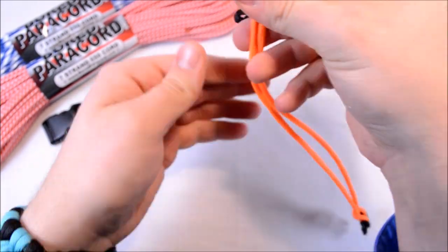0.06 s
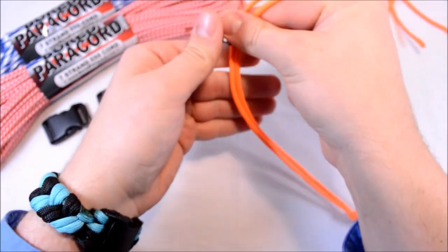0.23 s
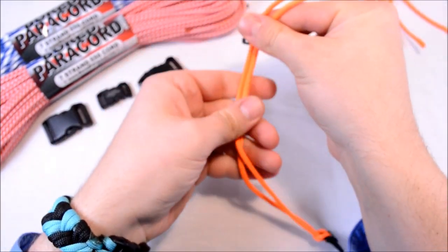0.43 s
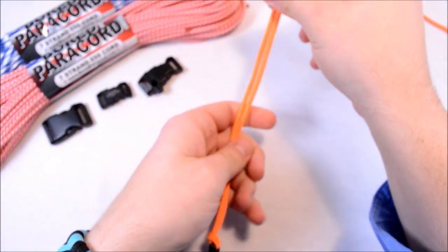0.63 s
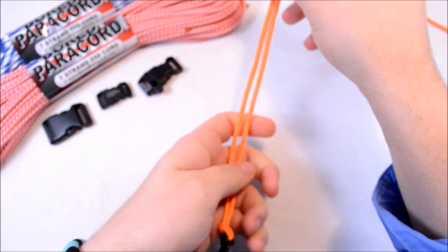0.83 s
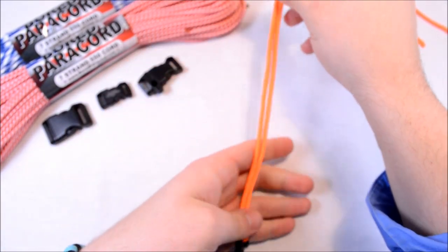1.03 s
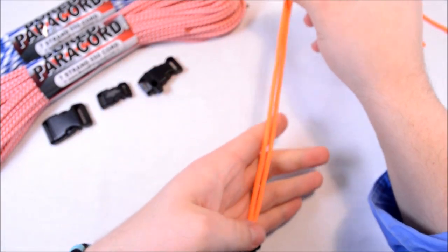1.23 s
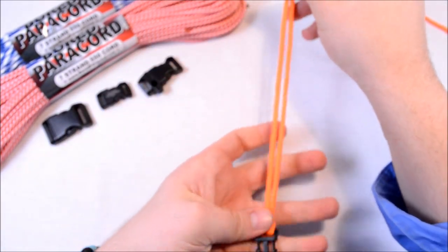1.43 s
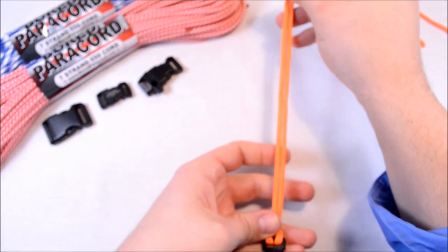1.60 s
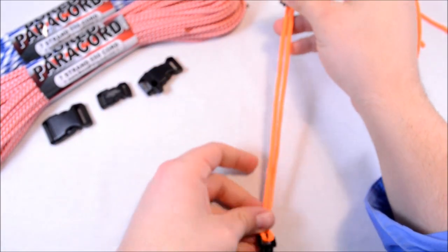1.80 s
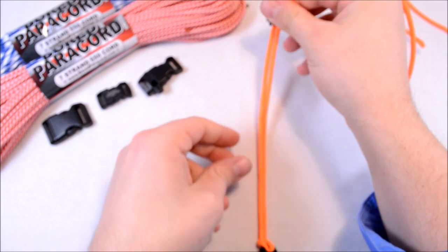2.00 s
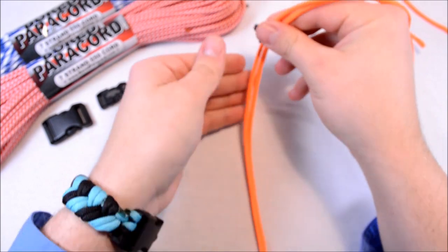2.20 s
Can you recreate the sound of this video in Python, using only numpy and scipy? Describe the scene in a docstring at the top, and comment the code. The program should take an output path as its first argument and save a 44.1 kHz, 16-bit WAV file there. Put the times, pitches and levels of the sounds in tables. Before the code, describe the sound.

Nylon cord slides through fingers in soft, hissing strokes close to the microphone. A plastic buckle knocks on a covered table near the start and again near the end, over a faint fan hum in a small room.

```python
"""Nylon cord through the fingers

Close to the microphone, a doubled nylon cord slides through the fingers in soft, hissing strokes.
The plastic buckle on its end knocks twice on a covered table, rebounding, and the hands bump softly.
The place is a small quiet room, with a fan's hum and a thin electronic whine in the background."""
import sys
import numpy as np
from scipy import signal
from scipy.fft import rfft, irfft, next_fast_len
from scipy.io import wavfile

SR = 44100
rng = np.random.default_rng(int(sys.argv[2]) if len(sys.argv) > 2 else 0)


def output_pcm(signal):
    """Save a mono or channel-first signal as 16-bit PCM at the path in sys.argv[1].

    Samples are clipped to [-1, 1] before scaling.
    """
    pcm = np.clip(np.atleast_2d(signal).T, -1, 1) * 32767
    wavfile.write(sys.argv[1], SR, np.round(pcm).astype(np.int16))


N = 103635


def undb(db):
    """Decibels to amplitude."""
    return 10 ** (np.asarray(db) / 20)


def unit(x):
    """Scale to rms 1."""
    return x / np.sqrt(np.mean(x ** 2))


def fade(t, t60):
    """Exponential decay, 60 dB down at t60."""
    return np.exp(-np.log(1000) * t / t60)


def colour(x, points):
    """Minimum-phase filter through points of (frequency [Hz], gain [dB])."""
    size = next_fast_len(len(x) + 4096) * 2
    hz, db = np.array(points, float).T
    bin_hz = np.arange(size // 2 + 1) * SR / size
    gain_db = np.interp(np.log(bin_hz + 1), np.log(hz), db)
    cepstrum = irfft(np.log(undb(gain_db)))
    cepstrum[1:size // 2] *= 2  # folded, so nothing rings ahead of a knock
    cepstrum[size // 2 + 1:] = 0
    return irfft(rfft(x, size) * np.exp(rfft(cepstrum)))[:len(x)]


def noise(points):
    """Coloured noise of rms 1."""
    return unit(colour(rng.standard_normal(N), points))


def band(hz, width):
    """Narrow noise of rms 1 around one frequency."""
    bin_hz = np.arange(N // 2 + 1) * SR / N
    detuning = (bin_hz - hz) / (width / 2)
    return unit(irfft(rfft(rng.standard_normal(N)) / (1 + detuning ** 2), N))


def wander(per_second):
    """Random curve of rms 1 that glides to a new value so many times a second."""
    return unit(np.interp(np.arange(N) * per_second / SR, np.arange(N), rng.standard_normal(N)))


def swell(start, length, attack, release):
    """Straight rise and fall, capped at 1; times in seconds."""
    t = np.arange(N) / SR - start
    return np.clip(np.minimum(t / attack, (length - t) / release), 0, 1)


def add(out, at, x):
    """Mix x in at a time in seconds."""
    i = int(at * SR)
    out[i:i + len(x)] += x[:N - i]


# Spectrum of the quiet room (frequency [Hz], relative level [dB])
ROOM_TONE_SPECTRUM = [(12, -78), (20, -3), (49, -2), (163, -3.5), (228, -4), (277, -10.5), (558, -14),
                      (678, -16), (976, -16.5), (1400, -19.5), (1530, -19.5), (2140, -23.5), (2910, -25),
                      (3630, -21), (4180, -28), (9670, -28.5), (16000, -35.5)]
# Hum of the fan in the background (centre [Hz], width [Hz], level [dB])
FAN_BANDS = [(222.4, 6.8, -52.5), (182.1, 8.1, -58), (456.7, 21, -64.5), (1524, 42, -67.5),
             (2692, 60, -69.5), (3650, 330, -64)]


def background():
    """Behind the hands: faintly flickering room tone, a fan's hum and a steady electronic whine."""
    room_tone = undb(-47 + 0.58 * wander(per_second=12.81)) * noise(ROOM_TONE_SPECTRUM)
    fan = sum(undb(db) * band(hz, width) for hz, width, db in FAN_BANDS)
    whine_hz, whine_db = 15668, -71
    whine = undb(whine_db) * np.sqrt(2) * np.sin(2 * np.pi * whine_hz * np.arange(N) / SR)
    return room_tone + fan + whine


def small_room(direct):
    """The walls return a short diffuse tail to the microphone, thin in the bass; the treble dies first."""
    low_hz, split_hz, gap_s, tail_db = 527, 1510, 0.0094, -10
    t = np.arange(SR // 2) / SR
    mid_pass = signal.butter(2, [low_hz, split_hz], "band", fs=SR, output="sos")
    high_pass = signal.butter(2, split_hz, "high", fs=SR, output="sos")
    mids = signal.sosfilt(mid_pass, rng.standard_normal(len(t))) * fade(t, t60=0.23)
    treble = signal.sosfilt(high_pass, rng.standard_normal(len(t))) * fade(t, t60=0.17)
    tail = (mids + treble) * (t > gap_s)
    return direct + undb(tail_db) * signal.fftconvolve(direct, tail / np.linalg.norm(tail))[:N]


# Soft bumps near the microphone (time [s], pitch [Hz], t60 [s], level [dB])
HAND_BUMPS = [(1.139, 131, 0.061, -29.5), (1.223, 150, 0.11, -36.5), (1.639, 122, 0.11, -36)]


def hands():
    """Each bump of the hands is one low, quickly damped tone."""
    out, t = np.zeros(N), np.arange(SR // 4) / SR
    for at, hz, t60, db in HAND_BUMPS:
        add(out, at, undb(db) * np.sin(2 * np.pi * hz * t) * fade(t, t60))
    return out


# Modes of table and buckle (frequency [Hz], relative level [dB], free t60 [s])
KNOCK_MODES = [(156.6, -27, 0.39), (191, -16, 0.17), (298.5, -4.5, 0.21), (387, 4.5, 0.039),
               (416.2, -2.5, 0.12), (519.6, 0, 0.09), (616.4, -10.5, 0.15), (644, -10.5, 0.11),
               (749, -9.5, 0.13), (801, -8.5, 0.1), (836, -8, 0.092), (873, -14, 0.051), (926, -8, 0.078),
               (981, -11.5, 0.085), (1254, -10.5, 0.13), (1377, -13, 0.11), (1634, -16, 0.14),
               (1780, -26, 0.14), (1968, -20, 0.1), (3240, -16, 0.12), (3500, -17.5, 0.16)]
# Spectrum of the contact crack (frequency [Hz], relative level [dB])
CRACK_SPECTRUM = [(100, -3.5), (400, 3.5), (1000, -7), (2000, -6.5), (3300, -7.5), (3900, -9.5),
                  (5000, -6.5), (6200, -10), (7000, -21), (10000, -25), (13000, -47), (16000, -52)]
# Landings on the covered table
# (time [s], thump gain [dB], body gain [dB], clack gain [dB], snap gain [dB], share of free t60 [ratio])
BUCKLE_LANDINGS = [(0.2314, -16, -23, -23.5, -19, 0.99), (0.2862, -34.5, -30, -31.5, -55, 0.78),
                   (0.335, -42, -49, -48, -48, 0.93), (0.485, -33.5, -45.5, -43, -72, 0.49),
                   (2.0033, -23.5, -19, -16, -25.5, 0.82), (2.0320, -39, -38, -30, -40.5, 0.47)]


def buckle():
    """Contact cracks and sets table and buckle ringing; how it lands sets the colour and damping."""
    thump_hz, body_hz, clack_hz, snap_hz, low_cut_hz = 367, 615, 1400, 4370, 100
    out, t = np.zeros(N), np.arange(SR // 3) / SR
    for at, thump_db, body_db, clack_db, snap_db, share in BUCKLE_LANDINGS:
        ring = sum((-1) ** k * undb(db) * np.sin(2 * np.pi * hz * t) * fade(t, share * t60)
                   for k, (hz, db, t60) in enumerate(KNOCK_MODES))
        crack = undb(2) * noise(CRACK_SPECTRUM)[:len(t)] * fade(t, t60=share * 0.06)
        landing = [(thump_hz, thump_db), (body_hz, body_db), (clack_hz, clack_db), (snap_hz, snap_db)]
        add(out, at, colour(ring + crack, landing))
    low_cut = signal.butter(4, low_cut_hz, "high", fs=SR, output="sos")
    return signal.sosfilt(low_cut, out)


# Spectra of the sliding braid at close range (frequency [Hz], relative level [dB])
HISS_SPECTRUM = [(2000, -27), (5000, -14), (7000, -5.5), (8500, -4.5), (10000, 0.5), (11200, -4.5),
                 (13000, -16.5), (16000, -30)]
RASP_SPECTRUM = [(300, -11), (1200, 0), (2500, -17), (3600, -10.5), (4400, 0.5), (6000, -2.5), (7500, -9.5),
                 (12000, -17)]
FLICK_SPECTRUM = [(6000, -35), (10000, -4), (11800, 2), (13500, -3), (16000, -11)]
# Pulls through the fingers (start [s], length [s], attack [s], release [s], hiss [dB], rasp [dB])
CORD_STROKES = [(-.02, 0.063, .01, 0.012, -59.5, -54), (0.02, 0.41, 0.17, 0.086, -57, -58),
                (0.364, 0.018, 0.005, 0.014, -47.5, -57), (0.506, 0.19, 0.085, 0.088, -47.5, -56),
                (0.602, 0.25, 0.13, 0.08, -47.5, -68), (0.797, 0.088, 0.045, 0.03, -51.5, -60),
                (0.905, 0.24, 0.048, 0.032, -58.5, -62), (1.167, 0.088, 0.023, 0.034, -54, -52),
                (1.218, 0.074, 0.026, 0.039, -50.5, -50.5), (1.484, 0.11, 0.054, 0.046, -53.5, -68),
                (1.559, 0.13, 0.1, 0.024, -50, -62), (1.656, 0.04, 0.022, 0.018, -58, -56),
                (1.774, 0.076, .03, .03, -60.5, -63), (1.893, 0.18, 0.13, 0.037, -47, -49),
                (2.196, 0.32, 0.047, 0.032, -62.5, -72)]


def cord():
    """Fibres catch and slip on the skin: a fine hiss and a lower rasp, unsteady with the grip."""
    hiss, rasp = noise(HISS_SPECTRUM), noise(RASP_SPECTRUM)
    strokes = sum(swell(at, length, attack, release) * (undb(hiss_db) * hiss + undb(rasp_db) * rasp)
                  for at, length, attack, release, hiss_db, rasp_db in CORD_STROKES)
    # the cord zips briefly under a tight pinch
    pinch = swell(start=1.932, length=0.06, attack=0.03, release=0.03)
    pinch_zip = undb(-50) * pinch * band(hz=5380, width=520)
    # a bright flick as the fingers speed up at the end of a pull
    speed_up = swell(start=1.8, length=0.096, attack=0.055, release=0.025)
    flick = undb(-52) * speed_up * noise(FLICK_SPECTRUM)
    grip_db = wander(per_second=40)
    return (strokes + pinch_zip + flick) * undb(grip_db)


def scene():
    """One microphone: cord and hands close and dry, knocks with the room's tail, background behind."""
    return (small_room(buckle()) + cord() + hands() + background())[None]


def record(dry):
    """The recorder cuts the top of the treble steeply."""
    top_hz = 15800
    return signal.sosfilt(signal.ellip(12, .1, 70, top_hz, fs=SR, output="sos"), dry)


dry = scene()
out = record(dry)
output_pcm(out)
```